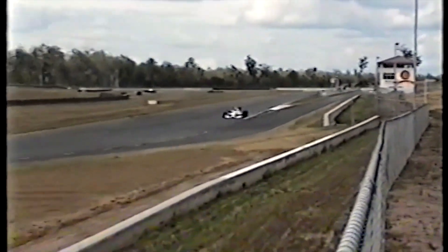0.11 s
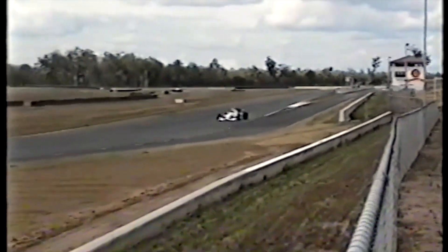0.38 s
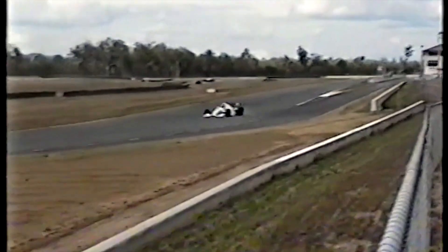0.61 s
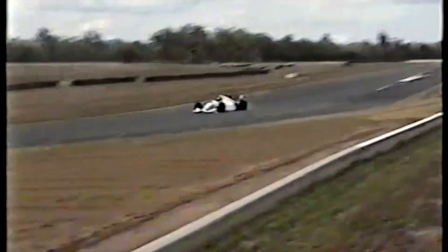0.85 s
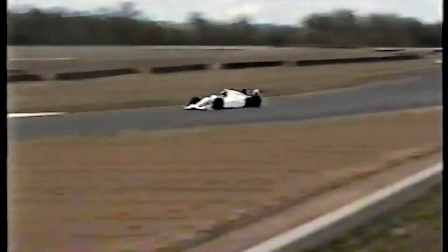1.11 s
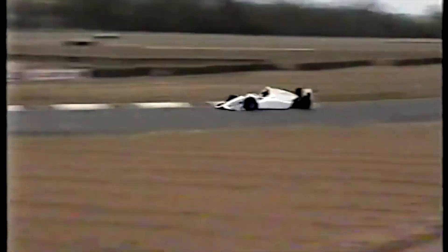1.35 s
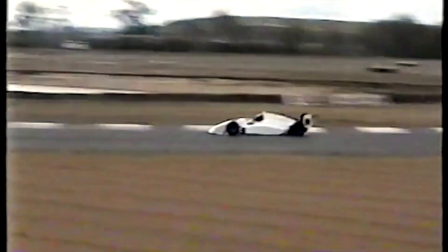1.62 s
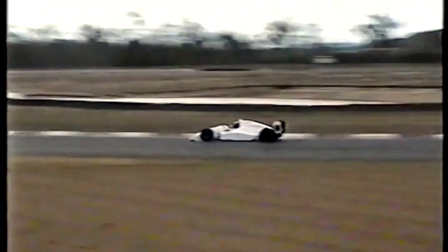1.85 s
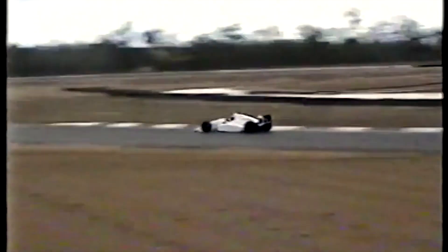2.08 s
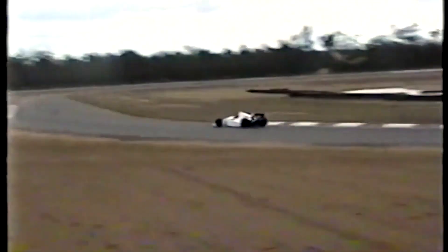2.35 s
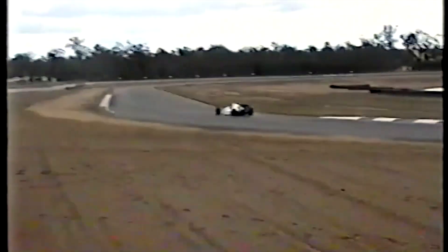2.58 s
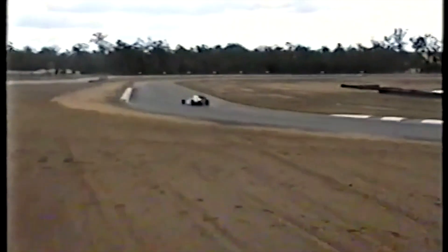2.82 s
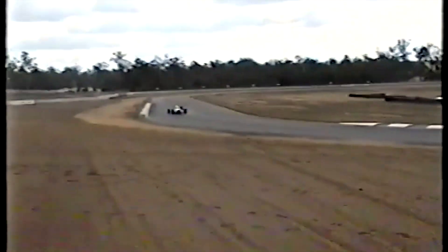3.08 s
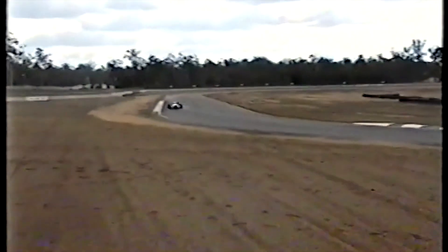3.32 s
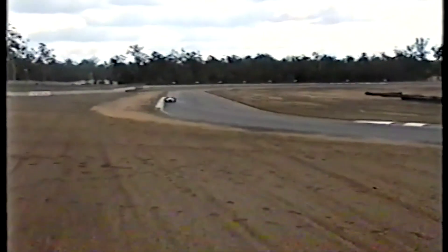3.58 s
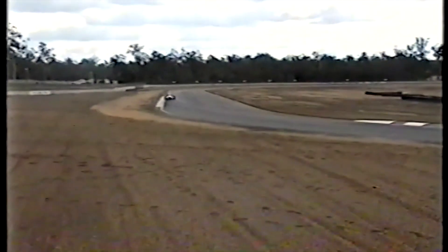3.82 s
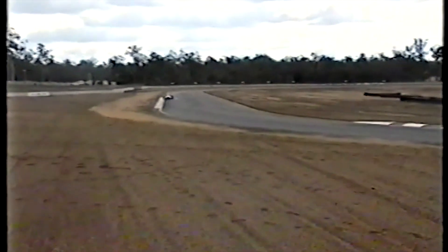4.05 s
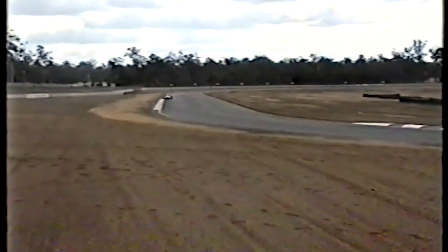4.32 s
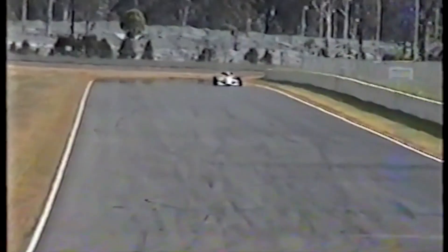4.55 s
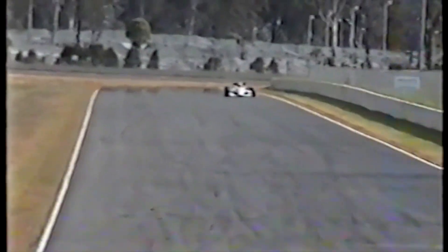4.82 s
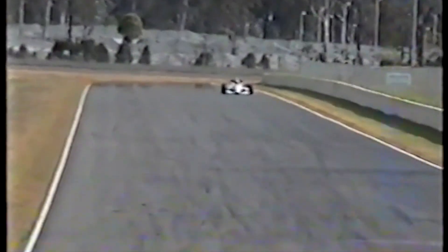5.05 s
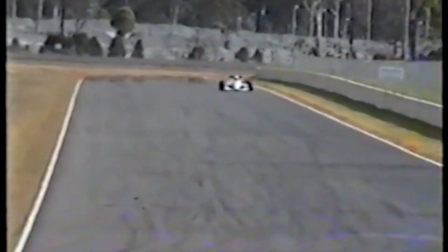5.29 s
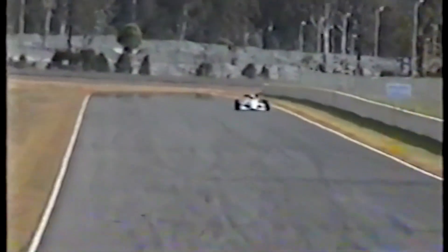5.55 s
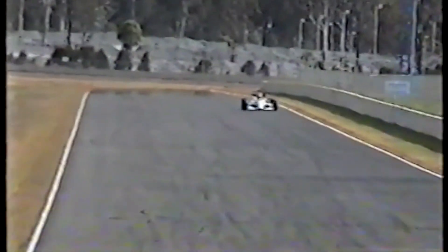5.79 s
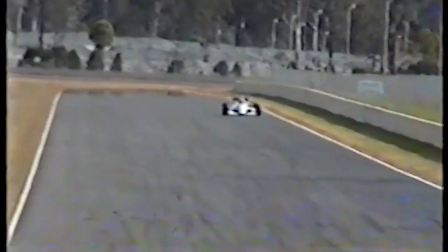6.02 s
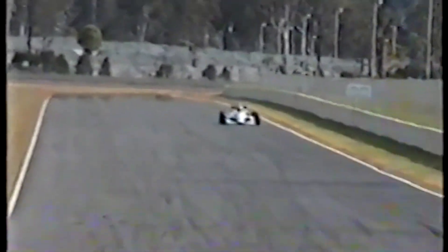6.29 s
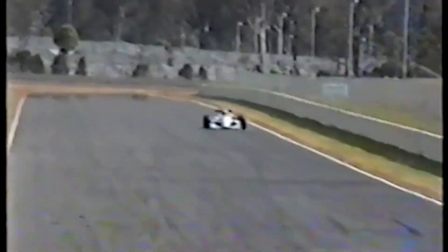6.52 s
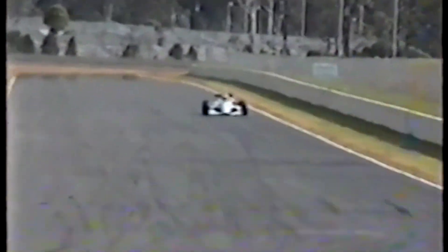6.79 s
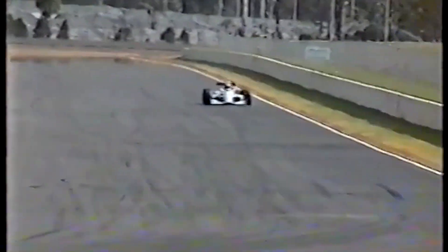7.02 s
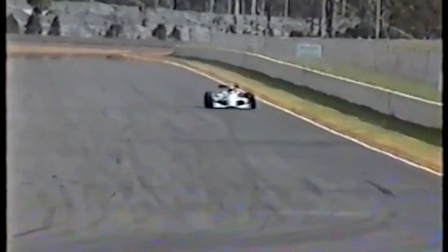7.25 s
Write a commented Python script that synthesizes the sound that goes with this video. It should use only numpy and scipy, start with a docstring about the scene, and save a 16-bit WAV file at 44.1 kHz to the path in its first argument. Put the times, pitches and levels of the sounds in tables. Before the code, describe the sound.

Loud screaming single-seater sweeps by a trackside microphone with crackling exhaust and falling pitch, then a sudden hush, hiss and a far-off engine nearing.

```python
"""A six-cylinder racing car brakes into a corner, opens the throttle and sweeps past; then, abruptly,
it comes up a straight from far away. Its sound is tones tied to the turning engine over shaped noise.
Wandering tones make the gearbox whine and a distant drone; sliding bands of noise make a bird's chirr.
Tape hiss and a low hum lie beneath. One microphone feeds the left track; the right is almost silent."""
import sys
import numpy as np
from scipy import signal
from scipy.fft import rfft, irfft
from scipy.io import wavfile
from scipy.ndimage import uniform_filter1d

SR = 44100
rng = np.random.default_rng(int(sys.argv[2]) if len(sys.argv) > 2 else 0)


def waveform_to_disk(signal):
    """Save audio, clipped to [-1, 1], as 16-bit WAV at the path in sys.argv[1]."""
    frames = np.transpose(np.atleast_2d(signal))
    scaled = np.clip(frames, -1, 1) * 32767
    samples = np.round(scaled).astype(np.int16)
    wavfile.write(sys.argv[1], SR, samples)


def voltage_ratio(decibels):
    """Convert decibels (scalar or array-like) to amplitude ratios, 20 dB per decade."""
    exponent = np.asarray(decibels, float) / 20
    return 10 ** exponent


N = 325881  # length in samples

# Source levels below are those before record() doubles the whole mix.
# The car in three stages; columns: start_s, engine_cycle_hz, roar_level_db
BRAKING = [(0.0, 63, -27), (0.306, 57.05, -25.5), (0.486, 57.9, -29), (0.638, 55.8, -27), (0.83, 56.1, -26)]
PASSING = [(0.75, 55.3, -27.5), (0.861, 56.42, -25), (1.0, 55.93, -20.5), (1.111, 55.88, -24.5),
           (1.25, 54.85, -22), (1.4, 54, -26.5), (1.55, 52.62, -24.5), (1.801, 49.05, -29.5),
           (2.13, 45.93, -26), (2.44, 44.42, -27.5), (2.89, 43.3, -26), (3.59, 43.57, -21.5),
           (3.83, 43.64, -21), (3.94, 44.25, -20.5), (4.11, 44.05, -22.5), (4.4, 44.16, -21),
           (4.6, 44.45, -25.5)]
COMING = [(4.63, 67.36, -56), (5.151, 66.7, -53.5), (5.26, 68.55, -53.5), (5.931, 69.9, -48.5),
          (6.4, 70.36, -46), (6.52, 71.2, -40.5), (7.008, 71.64, -38.5), (7.189, 71.35, -38.5),
          (7.39, 73.45, -38)]
# Unequal cylinders, a row per stage: relative level_db of the weaker orders, by order number modulo 6
UNEVEN_CYLINDERS = [
    [-13.5, -17, 30, -17, -17, 5],
    [1, -14.5, -2, 0, -2, -13.5],
    [0, -11.5, -4, -10, -13, -7],
]
# Colour of exhaust and road noise, one or two (early, late) per stage; columns: pitch_hz, relative level_db
NOISE_COLOURS = [
    [[(59, -22), (100, 4), (184, 10.5), (355, -8.5), (530, -18.5), (879, -3), (1340, -14.5), (2040, -14.5),
     (6950, -34), (15500, -59)]],
    [[(180, -6), (300, -4.5), (446, -22), (663, -3), (2610, -16.5), (7250, -20.5), (15500, -43)],
     [(180, -20), (300, -14.5), (461, -9), (781, -6), (863, -12.5), (1540, -8), (1910, -10), (7020, -23.5),
     (15500, -54.5)]],
    [[(59, -39), (100, 12.5), (362, -2), (808, -5.5), (1020, -40), (2000, -15), (5630, -33.5), (6660, -46),
     (8770, -20), (13400, -62), (15500, -68)], [(59, -55), (100, -44), (497, -10), (712, -10), (861, -4),
     (1130, -10), (3540, -18), (15500, -49.5)]],
]
# Manner of each stage; columns: weak_orders_over_noise_db, unsteady_speed_share, weak_order_fade_db,
# chopped_by_firing_share, colour_turn_s, colour_turn_length_s, strong_order_fade_db, noise_set_in_s,
# die_out_s, roar_top_hz, air_blur_factor
MANNER = [(-13.5, 0.008, 16, 0, 0.37, 0.24, 2.7, .003, .08, 3300, 1),
          (3.5, 0.0014, 8, 0.25, 1.83, 1, 3, .09, .002, 4020, 1),
          (4.5, 0.001, 7, 0.22, 5.56, 1, 4.2, .03, .002, 5500, 1.3)]
# Gearbox whines, one list each; columns: start_s, pitch_hz, level_db
WHINES = [
    [(0, 3460, -36), (.1, 3440, -36), (.14, 3125, -37), (.185, 3200, -35), (.26, 3125, -36),
     (.64, 3030, -40)],
    [(.165, 3450, -35), (.23, 3350, -40), (.3, 3370, -46)],
    [(4.75, 3490, -69), (5.5, 3535, -62), (6.3, 3590, -56), (7.39, 3610, -52)],
    [(5.2, 3340, -64), (5.8, 3385, -61), (7.39, 3450, -58)],
]
# How far each whine wanders in strength: fade_db
WHINE_FADES = [3, 2, 8, 8]
# Revs shivering over bumps; columns: start_s, depth_share_of_speed, shiver_hz, decay_s
BUMPS = [(2.59, .055, 11.5, .09), (3.9, .045, 12, .08)]
# A bird chirrs nearby; each entry: half_width_hz and rows of start_s, pitch_hz, level_db
CHIRRS = [ (40, [(6.228, 4917, -57), (6.26, 4980, -58)]), (120, [(6.255, 6010, -55), (6.345, 5770, -50)]),
          (380, [(6.3, 6350, -45), (6.43, 6180, -49), (6.66, 6017, -61)]), (150, [(6.64, 5970, -56),
          (6.74, 5600, -59)]), (89.9, [(6.762, 5450, -60), (6.79, 5900, -46), (6.86, 6010, -58)]),
          (500, [(6.76, 5440, -51), (6.95, 5500, -61)]), ]
# A distant drone; columns: start_s, pitch_hz, level_db
DRONE = [(4.62, 80.2, -67), (5.2, 77.4, -69), (5.5, 75, -85)]
# Colour of the tape hiss; columns: pitch_hz, relative level_db
HISS_COLOUR = [(50, -30), (130, 10.5), (3000, -1.5), (8000, -13.5), (15000, -27)]
# Tailpipe resonances; columns: pitch_hz, half_width_hz, extra_db (a third of it is used)
PIPE_RESONANCES = [(1270, 160, -8.5), (1915, 163, 0.5), (2700, 135, -5.5), (3224, 150, -6)]
# How far the resonances stand out in each noise colour, before that extra: lift_db
PIPE_LIFTS = [
    [5],
    [4, 8],
    [0, 2.5],
]
# The intake howls as the throttle opens; columns: middle_s, half_length_s, low_hz, high_hz, level_db
INTAKE_HOWL = (0.97, 0.15, 1600, 4800, 3)
# Parts that stand out in each stage; columns: early_level_db, late_level_db, share_of_roar_changes
PARTS = [{"rumble": (-33, -29.5, 0.083), "rasp": (-38, -36, 0.069), "order 3": (-30, -32, 0.15),
         "order 4": (-31, -42, .3), "order 6": (-36, -28.5, 0.3),
         "order 15": (-25.5, -49, 0.29)}, {"rumble": (-33, -43, 0.24), "rasp": (-30, -25, 0.99),
         "order 6": (-25.5, -23, 0.11), "order 9": (-37.5, -32, 0.13), "order 12": (-21.5, -24.5, 0.52),
         "order 15": (-30.5, -28.5, 0.43), "order 18": (-30.5, -25, 0.087), "order 24": (-35, -29.5, 0.13),
         "order 30": (-36, -28, 0.22), "order 36": (-44, -40, 0.47), "order 42": (-39.5, -40, 0.49),
         "order 48": (-40, -36.5, 0.25), "order 60": (-46.5, -39, 0.26)}, {"rumble": (-58, -62.5, 0.21),
         "rasp": (-33.5, -111, 0.088), "order 6": (-37.5, -51, 1), "order 8": (-54, -50.5, 0.59),
         "order 12": (-48, -41.5, 0.99), "order 24": (-66, -42.5, 1), "order 27": (-46.5, -47.5, 0.97)}]
# Single parts swell or sink for a while; columns: middle_s, half_length_s, change_db
SWELLS = {"rumble": [(.49, 0.062, -4), (5.12, 0.2, 9)], "rasp": [(.92, 0.071, 1.5), (2.25, 0.36, 5),
          (4.5, 0.87, -13)], "order 4": [(.64, 0.076, 17)], "order 6": [(2.4, 0.53, -9)],
          "order 8": [(6.62, 0.21, 7)], "order 9": [(2.4, 0.97, -14.5)], "order 12": [(1.04, 0.08, -13),
          (3.8, 0.12, -10), (5.1, 0.14, -17), (5.7, 0.63, 12.5), (6.7, 0.096, -16)],
          "order 15": [(.49, 0.11, 18.5), (2.44, 0.088, -11), (3.85, 0.089, -33.5)],
          "order 18": [(.88, 0.058, 8.5), (1.8, 0.23, 8), (2.4, 0.62, 5)], "order 24": [(3.87, 0.16, -11)],
          "order 30": [(1.8, 0.084, 6), (3.9, 0.27, 6)], "order 42": [(.96, .08, 9), (2.3, .3, 8),
          (3.95, 0.36, 14)]}
# All strong orders above the firing rate sink together; columns: middle_s, half_length_s, change_db
DIPS = [(3.56, 0.016, -1), (3.936, 0.016, -11)]
# Treble of the microphone; columns: pitch_hz, level_db
MICROPHONE = [(4800, -0.93), (6250, -6.5), (7400, -1), (11500, -4)]
# When the loudest spits sound in the rasp: start_s
LOUD_SPITS = [2.06, 2.205, 2.365, 2.41, 2.687]

# A peak slides down through the orders, like a ground echo that lags more and more.
SLIDE_S, SLIDE_HALF_S, SLIDE_FALL_S = 1.325, 0.54, 0.12  # middle, half length, time constant of the fall
SLIDE_FROM_HZ, SLIDE_TO_HZ = 1020, 540  # pitch at the middle, and the pitch it settles to
SLIDE_OCTAVES, SLIDE_DB = 0.75, 7  # half width and height of the peak
# With little air between car and microphone, this share is taken off the blur factor.
NEAR_S, NEAR_HALF_S, NEAR_CLEAR = 2.15, 0.5, 0.7
SPITS_PER_S, SPIT_DECAY_S, SPIT_DB = 30, 0.015, -12
LOUD_SPIT_SIZE = 4.5  # small spits are held to 2 at most
HUM_DB, HUM_DROP_DB, HISS_DB, LEAK_DB = -46, -45, -57.5, -60
TAPE_KNEE = 1.07  # peaks round off towards this height


def engine(rows, parts, uneven, colours, lifts, manner):
    """Tones at multiples (orders) of the engine cycle sound over noise that each firing chops."""
    t, hz, roar_db = columns(rows)
    orders_db, unsteady, fade_db, chop, turn_s, turn_span, strong_fade_db, set_in_s, die_s, top_hz, haze = manner
    blur = haze - NEAR_CLEAR * bells(t, [(NEAR_S, NEAR_HALF_S, 1)])
    late = 0.5 + 0.5 * np.tanh((t - turn_s) / turn_span)
    level = {}
    for name, (early_db, late_db, share) in parts.items():
        level[name] = early_db + (late_db - early_db) * late + share * (roar_db - roar_db.max())
        level[name] += bells(t, SWELLS.get(name, []))

    turns = engine_turns(t, hz, unsteady * blur)
    tones, weak = firing_orders(t, hz, turns, level, uneven, blur, fade_db, strong_fade_db)
    puffs = exhaust_puffs(turns, chop)
    drive = evened(puffs * rng.standard_normal(len(t))) + voltage_ratio(orders_db) * evened(weak) * 0.29
    early_body = piped(coloured(drive, colours[0]), lifts[0])
    late_body = piped(coloured(drive, colours[-1]), lifts[-1])
    bodies = [(1 - late, early_body), (late, late_body)]

    noise = voltage_ratio(level["rumble"]) * evened(band(drive, 75, 193))
    noise += voltage_ratio(roar_db) * exhaust_roar(t, bodies, top_hz)
    noise += voltage_ratio(level["rasp"]) * exhaust_rasp(t, bodies)
    age = (t - t[0]) / set_in_s
    # The orders set in sooner than the noise.
    sound = tones * np.clip(3 * age, 0, 1) + noise * np.sqrt(np.clip(age, 0, 1))
    return sound * np.sqrt(np.clip((t[-1] - t) / die_s, 0, 1))


def engine_turns(t, hz, unsteady):
    """Adds up engine cycles at a speed that wanders and shivers over bumps."""
    speed = 1 + unsteady * drift(t, 40)
    for s, depth, bump_hz, decay_s in BUMPS:
        since = np.maximum(t - s, 0)
        speed += depth * np.exp(-since / decay_s) * np.sin(2 * np.pi * bump_hz * since)
    return np.cumsum(hz * speed) / SR


def firing_orders(t, hz, turns, level, uneven, blur, fade_db, strong_fade_db):
    """Repeating firings give tones at whole multiples of the cycle; air on the way makes them fade."""
    peak_hz = SLIDE_TO_HZ + (SLIDE_FROM_HZ - SLIDE_TO_HZ) * np.exp((SLIDE_S - t) / SLIDE_FALL_S)
    slide_db = bells(t, [(SLIDE_S, SLIDE_HALF_S, SLIDE_DB)])
    dip_db = bells(t, DIPS)
    strong, weak = np.zeros(len(t)), np.zeros(len(t))
    for k in range(1, 91):
        name = "order " + str(k)
        # Strong orders nearly line up into one blow per firing.
        start = rng.random() * (0.12 if name in level else 1)
        shiver = 0.004 * k * blur * drift(t, 30)
        wave = np.cos(2 * np.pi * (k * turns + start + shiver))
        fade = np.tanh(drift(t, 5 + 0.4 * k))  # high orders flutter faster
        if name in level:
            octaves_off = np.log2(k * hz / peak_hz)
            lift_db = slide_db * np.exp(-(octaves_off / SLIDE_OCTAVES) ** 2) + dip_db * (k > len(uneven))
            unrest_db = blur * (strong_fade_db * fade + 0.08 * k * np.tanh(drift(t, 45)))
            roughness = 1 + 0.013 * k * blur * drift(t, 160)
            strong += np.sqrt(2) * voltage_ratio(level[name] + lift_db + unrest_db) * wave * roughness
        else:
            weak += voltage_ratio(uneven[k % 6] + fade_db * fade) * wave
    return strong, weak


def exhaust_puffs(turns, chop):
    """Six firings per cycle each start a decaying puff of uneven size."""
    decay = np.exp(-(6 * turns % 1) / 0.54)
    return 1 - chop + 1.05 * chop * decay * voltage_ratio(12 * np.tanh(drift(6 * turns, 1)))


def exhaust_roar(t, bodies, top_hz):
    """Mid-range exhaust noise flutters in pipe bands and howls as the throttle opens."""
    roar = blend(bodies, 276, top_hz, (1300, 4500)) * voltage_ratio(1.37 * drift(t, 12))
    for lo_hz, hi_hz in ((1150, 1430), (1700, 2550), (2500, 3900)):
        roar += band(roar, lo_hz, hi_hz) * (voltage_ratio(2 * drift(t, 26)) - 1)
    s, half_s, lo_hz, hi_hz, howl_db = INTAKE_HOWL
    roar += voltage_ratio(howl_db) * np.exp(-((t - s) / half_s) ** 2) * band(roar, lo_hz, hi_hz)
    return roar


def exhaust_rasp(t, bodies):
    """Treble exhaust noise comes in uneven bursts, with sharp decaying spits on top."""
    crackle = voltage_ratio(2.27 * np.tanh(drift(t, 25.22)) + 0.27 * drift(t, 180))
    rasp = blend(bodies, 5000, 15700, (5000, 12000)) * crackle
    spits = (rng.random(len(t)) < SPITS_PER_S / SR) * np.minimum(rng.exponential(size=len(t)), 2)
    for s in LOUD_SPITS:
        spits[np.abs(t - s) < 0.5 / SR] = LOUD_SPIT_SIZE
    spits = uniform_filter1d(spits, size=150)  # softens the onsets
    spits = signal.lfilter([1], [1, -np.exp(-1 / (SPIT_DECAY_S * SR))], spits)
    return rasp + voltage_ratio(SPIT_DB) * spits * (rasp + 0.52 * band(rasp, 12000, 18000))


def piped(x, lift_db):
    """The tailpipe strengthens sound near its resonances."""
    hz = np.fft.rfftfreq(len(x), 1 / SR)
    gain_db = sum((lift_db + db / 3) / (1 + ((hz - f) / w) ** 2) for f, w, db in PIPE_RESONANCES)
    return irfft(rfft(x) * voltage_ratio(gain_db), len(x))


def blend(bodies, lo_hz, hi_hz, unit_band):
    """Crossfades one band of the coloured noises, each scaled by its strength in unit_band."""
    return sum(share * band(body, lo_hz, hi_hz) / np.std(band(body, *unit_band)) for share, body in bodies)


def gearbox_whine(rows, fade_db):
    """Meshing gears whine at a pitch and strength that wander."""
    return wavering(*columns(rows), spread_hz=3 * fade_db, fade_db=fade_db)


def bird_chirr(half_hz, rows):
    """Slow noise times a gliding tone gives a thin or raspy band that slides."""
    t, hz, db = columns(rows)
    low_pass = signal.butter(3, half_hz, fs=SR, output="sos")
    fuzz = signal.sosfilt(low_pass, rng.standard_normal(len(t) + 2000))[2000:]  # skips the filter's start
    fuzz = fuzz * voltage_ratio(1.3 * drift(t, 61))
    glide = np.sin(2 * np.pi * np.cumsum(hz) / SR)
    return voltage_ratio(db) * evened(fuzz * glide) * signal.windows.tukey(len(t), 0.45)


def distant_drone():
    """A low tone sinks in pitch and strength while its pitch wanders."""
    return wavering(*columns(DRONE), spread_hz=4.4, fade_db=0)


def tape_head_hum(t):
    """The spinning tape head gives low noise and a steady tone, far weaker from 4.6 s on."""
    shake = evened(band(rng.standard_normal(N), 7.7, 42))
    hum = evened(shake + 0.41 * np.sin(2 * np.pi * 25.5 * t))
    return hum * voltage_ratio(HUM_DB + HUM_DROP_DB * (t > PASSING[-1][0]))


def tape_hiss():
    """Tape hiss is steady random noise with a fixed colour."""
    return voltage_ratio(HISS_DB) * evened(coloured(rng.standard_normal(N), HISS_COLOUR))


def wavering(t, hz, db, spread_hz, fade_db):
    """A tone whose pitch and strength wander."""
    turns = np.cumsum(hz + spread_hz * drift(t, 30)) / SR
    strength = np.sqrt(2) * voltage_ratio(db + fade_db * np.tanh(drift(t, 30)))
    return strength * np.sin(2 * np.pi * turns)


def drift(t, hz):
    """Smooth chance of roughly unit size that changes about hz times per unit of t."""
    knots = uniform_filter1d(rng.standard_normal(size=6000), size=4, mode="wrap")
    return np.interp((t - t[0]) * hz * 4, np.arange(len(knots)), 2 * knots)


def bells(t, rows):
    """Sum of bell-shaped changes over time."""
    return sum(height * np.exp(-((t - s) / half_s) ** 2) for s, half_s, height in rows)


def coloured(x, points):
    """Shapes the spectrum by a table read on a log-pitch axis."""
    hz = np.fft.rfftfreq(len(x), 1 / SR)
    f, db = np.transpose(points)
    return irfft(rfft(x) * voltage_ratio(np.interp(np.log(hz + 1), np.log(f + 1), db)), len(x))


def band(x, lo_hz, hi_hz):
    """Keeps the sound between two pitches."""
    return signal.sosfilt(signal.butter(3, [lo_hz, hi_hz], "bandpass", fs=SR, output="sos"), x)


def evened(x):
    """Scales to an average (rms) strength of 1."""
    return x / np.sqrt(np.mean(x ** 2) + 1e-20)


def columns(rows):
    """Gives sample times and every other column joined by straight lines."""
    s, *values = np.transpose(rows)
    t = np.arange(s[0], s[-1], 1 / SR)
    return t, *(np.interp(t, s, v) for v in values)


def add(mix, s, sound):
    """Mixes a sound in at time s, in seconds."""
    part = mix[round(s * SR):][:len(sound)]
    part += sound[:len(part)]


def scene():
    """Places the car's three stages, its gears, the drone and the chirr in time."""
    mix = np.zeros(N)
    stages = (BRAKING, PASSING, COMING)
    for rows, *traits in zip(stages, PARTS, UNEVEN_CYLINDERS, NOISE_COLOURS, PIPE_LIFTS, MANNER):
        add(mix, rows[0][0], engine(rows, *traits))
    for rows, fade_db in zip(WHINES, WHINE_FADES):
        add(mix, rows[0][0], gearbox_whine(rows, fade_db))
    add(mix, DRONE[0][0], distant_drone())
    for half_hz, rows in CHIRRS:
        add(mix, rows[0][0], bird_chirr(half_hz, rows))
    return np.array([mix, mix])


def top_cut(x):
    """Nothing passes above the cut-off."""
    return signal.sosfilt(signal.butter(12, 15760, fs=SR, output="sos"), x)


def record(dry):
    """The microphone fills the left track and barely leaks right; the tape adds hum, hiss and rounding."""
    t = np.arange(N) / SR
    hum = tape_head_hum(t)
    heard = coloured(dry[0], MICROPHONE) + hum + tape_hiss()
    left = TAPE_KNEE * np.tanh(2 * heard / TAPE_KNEE)
    right = voltage_ratio(LEAK_DB) * left + 0.2 * hum
    return top_cut(np.array([left, right]))


dry = scene()
out = record(dry)
waveform_to_disk(out)
```